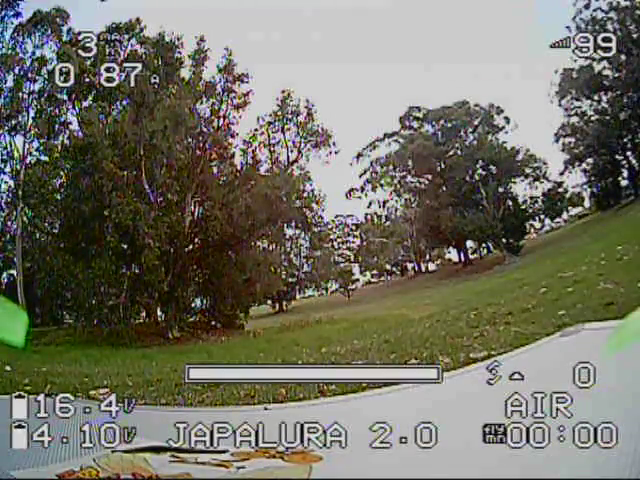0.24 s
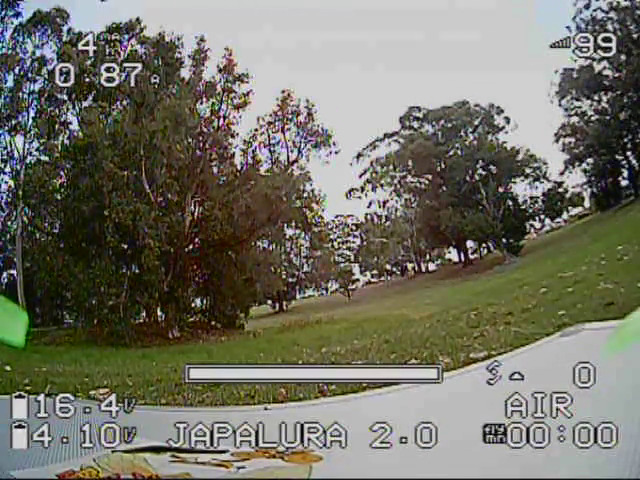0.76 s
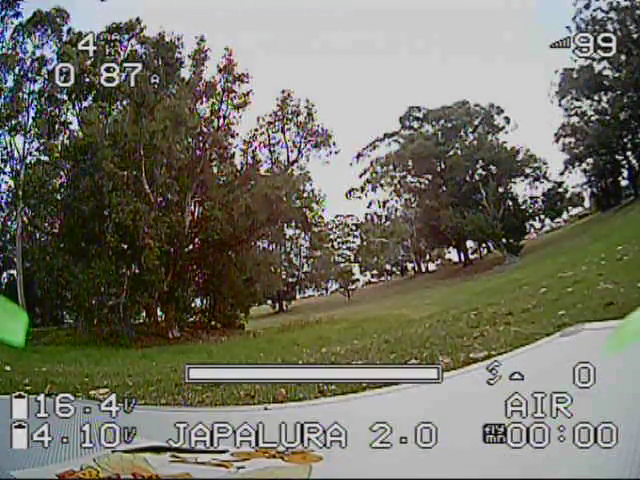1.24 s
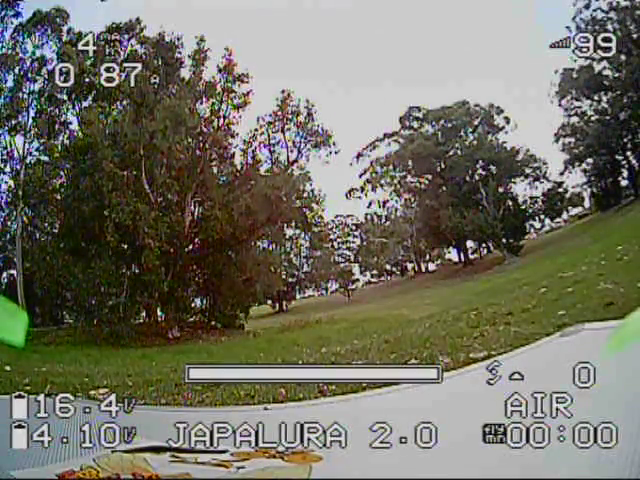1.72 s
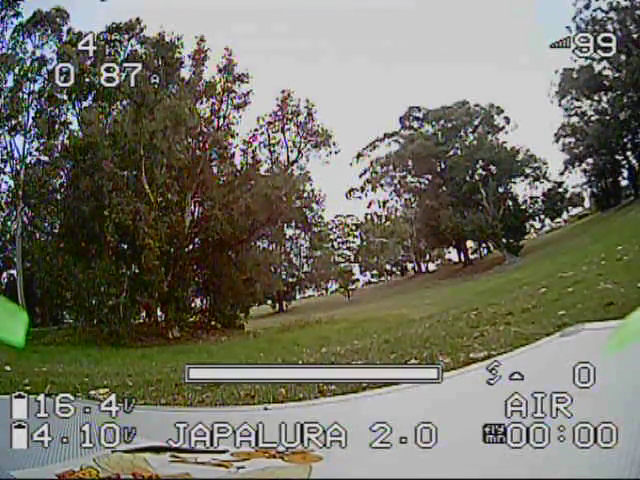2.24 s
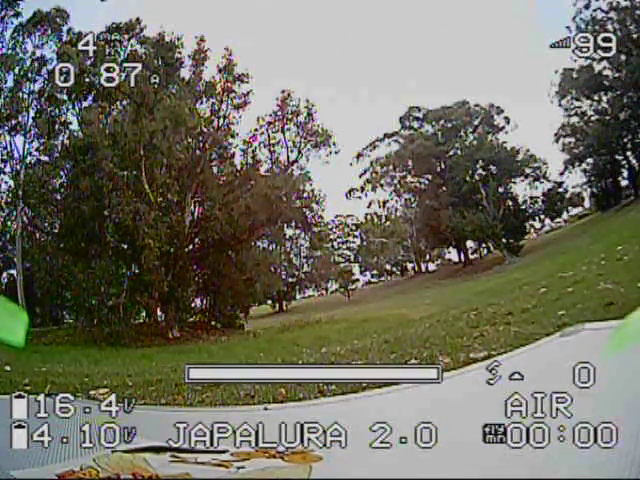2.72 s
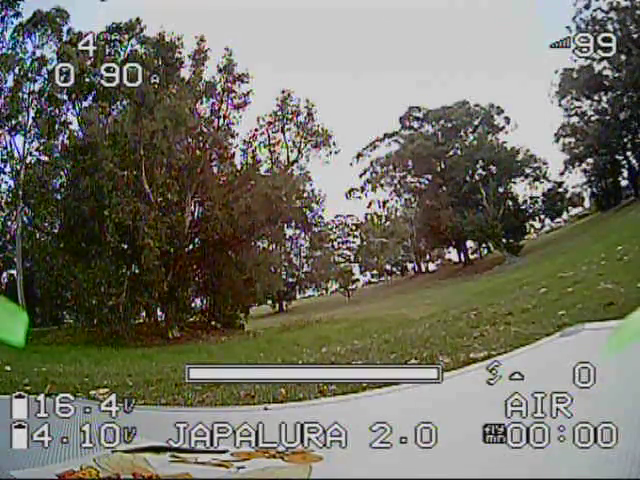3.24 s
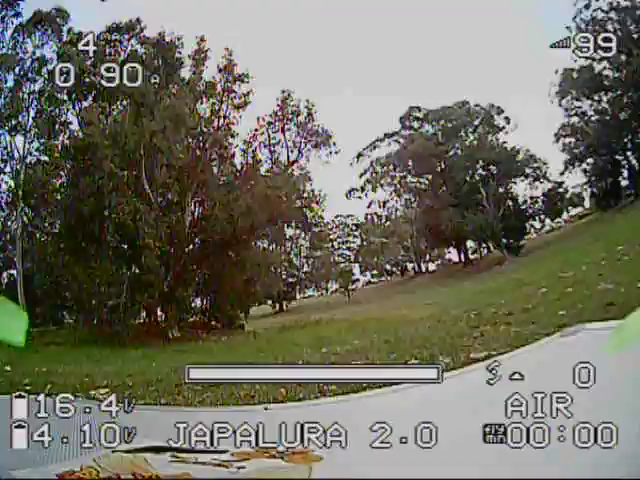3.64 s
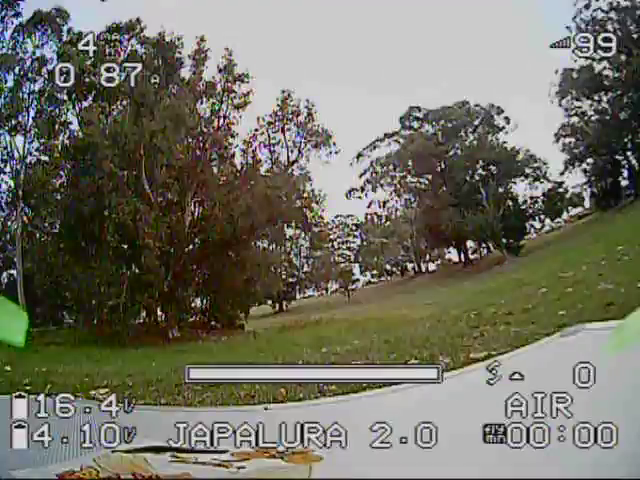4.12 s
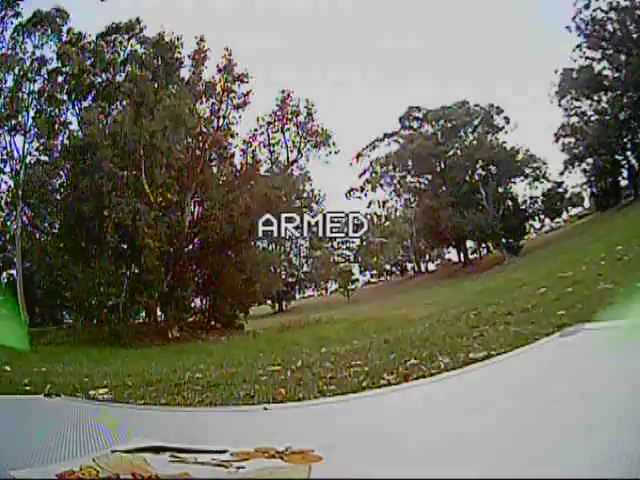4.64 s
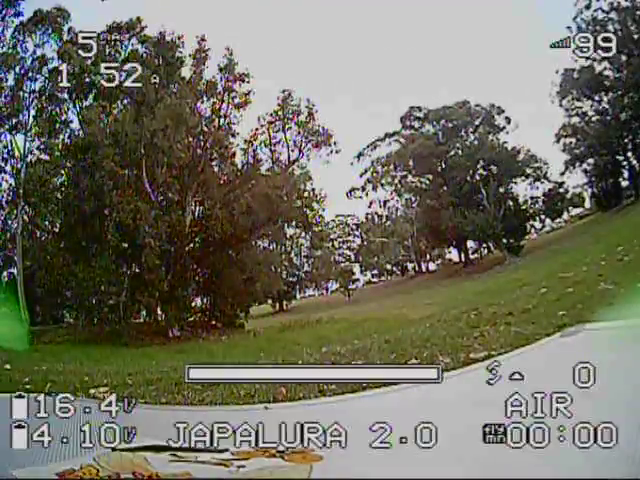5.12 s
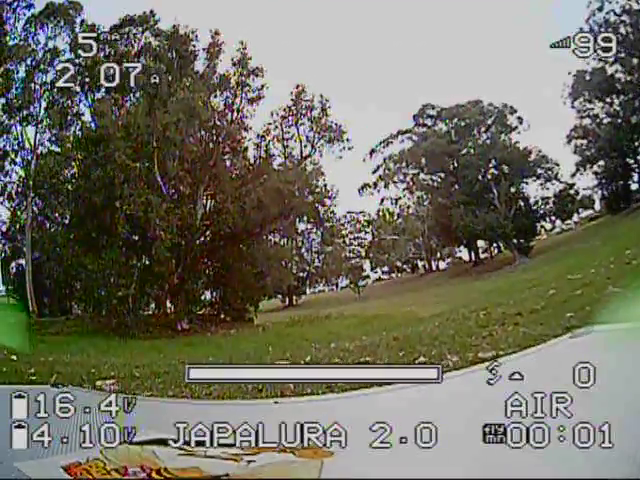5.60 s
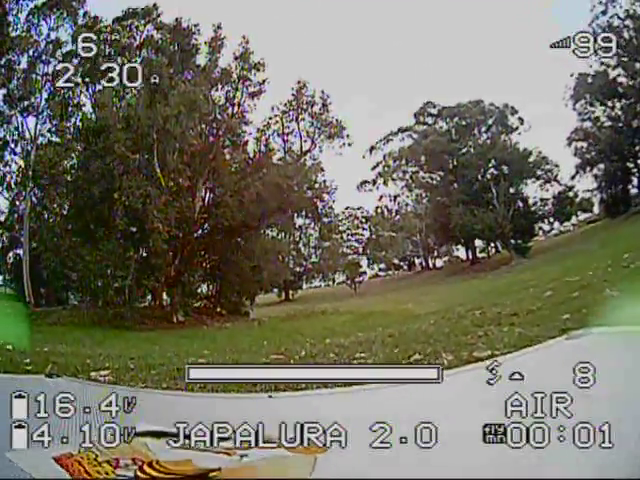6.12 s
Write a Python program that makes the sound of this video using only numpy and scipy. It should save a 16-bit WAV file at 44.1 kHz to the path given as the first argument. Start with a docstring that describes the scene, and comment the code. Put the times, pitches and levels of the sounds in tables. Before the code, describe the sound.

A small drone sits on pale ground in a grassy park, but only its video link is heard: a loud, unbroken electrical buzz at about 50 hertz, thick with fixed overtones and light hiss. The rasp fluctuates, surges into overload around two and three seconds, thins around four and a half to five, then returns. The sound is direct, dry and telephone-narrow, with no outdoor ambience or motor noise.

```python
"""The picture signal of a small drone's analog video link leaks into its sound channel: a loud, steady buzz.
Each field, 50 a second, sweeps the same hum, bright band and blanking gap; overlay text rows cut notches into it.
Busy zones of the field add puffs of noise over an even hiss. Three surges deepen the notches;
the main notch drops out while the overlay is cleared. The overdriven channel is telephone-narrow."""
import sys
import numpy as np
from scipy import signal
from scipy.fft import rfft, irfft
from scipy.io import wavfile

SR = 44100
rng = np.random.default_rng(int(sys.argv[2]) if len(sys.argv) > 2 else 0)


def wrap_up_sound(samples):
    """Save the sound to the file named by the first command line argument, as 16-bit audio."""
    columns = np.atleast_2d(samples).T
    # keep every value between -1 and 1, then stretch to whole-number steps
    tamed = np.clip(columns, -1, 1)
    steps = np.round(tamed * 32767).astype(np.int16)
    wavfile.write(sys.argv[1], SR, steps)


N = 280476

# Slow drift of the picture leak. Each row: time in seconds, leak (1 = main notch of depth 1).
LEAK_DRIFT = [(0.0, 0.34), (.28, 0.84), (.6, 0.28), (.95, .25), (1.22, 0.84), (1.62, 0.43), (1.86, .4),
              (2.1, 0.69), (2.22, 0.04), (2.7, 0.043), (2.86, 0.23), (3.06, 0), (3.2, 1.3), (3.38, 1.13),
              (3.66, 0.49), (4.57, 1.03), (5.65, 0.99), (6.36, 1.17)]
# Surges on top of the drift. Each row: start in seconds, rise in seconds, length in seconds, added leak.
LEAK_SURGES = [(1.655, 0.062, .195, 1.44), (1.867, 0.086, .31, 1.23), (3.075, .035, 0.18, 1.11)]
# Thin notches, always present. Each row: place in ms, half width in ms, mid depth, flicker in dB.
THIN_NOTCHES = [(7.4, .17, 0.21, 4), (13.35, 0.12, 0.091, 3), (16.85, 0.34, .16, 4.5),
                (17.9, 0.43, 0.065, 4)]
# Zones of fine, changing detail. Each row: place in ms, half width in ms, grain level in dB before overload.
GRAIN_ZONES = [(5.9, 0.59, -19), (7.3, 0.54, -15), (9.6, 0.87, -23.5), (11.9, 0.34, -18),
               (17.9, 0.85, -21.5)]
# Spectrum of the grain. Each row: frequency in Hz, relative density in dB per Hz.
GRAIN_SPECTRUM = [(60, -8.5), (250, 1), (600, 1.5), (950, -4), (1400, -1.2), (2100, -7.5), (3000, -10.5),
                  (4000, -10.5), (5000, -33.5)]
# Spectrum of the hiss. Each row: frequency in Hz, relative density in dB per Hz.
HISS_SPECTRUM = [(60, 2), (400, -3), (1000, -8), (2000, -7.5), (3800, -8.5), (5000, -31)]

FIELD_HZ, FIRST_FIELD_S = 49.9503, .012
FIELD_MS = 1000 / FIELD_HZ
T_S = np.arange(N) / SR
FIELDS = (T_S - FIRST_FIELD_S) * FIELD_HZ + 1  # running field count
SCAN_MS = FIELDS % 1 * FIELD_MS  # time since the top of the field

CHANNEL_RATE_HZ, EDGE_HZ = 8000, 16000
FULL_SCALE, OUTPUT_LIMIT = .71, .71
COUPLING_HZ = 19
BIAS = .03

SURGE_FALL_S = .09
OVERLOAD_LEAK = 1.2  # leak above this is overload
CLEAR_START_S, CLEAR_END_S = 4.58, 5.12  # main text row absent
CLEARED_LEAK, CLEARED_DELAY_MS = .42, .2  # the bright band starts later without text

# Second notch: depth and its growth; place with and without text.
SECOND_DEPTH, SECOND_PER_LEAK, SECOND_PER_OVERLOAD = .53, .18, .67
SECOND_MS, SECOND_CLEARED_MS = 10.3, 9.72
OVERSHOOT_PER_OVERLOAD = .28
# Near the end a third notch grows ever faster and the second fades.
LATE_START_S, LATE_GROWTH_PER_S2, LATE_FADE_PER_S = 5.23, .75, .42
# A notch at the bottom of the field shows only in overload.
BOTTOM_MS, BOTTOM_PER_OVERLOAD = 17.38, .3

# The mid-field rises with the leak and sags near the end.
SWING_REST, SWING_PER_LEAK, SWING_PER_OVERLOAD, SWING_SAG_PER_S = -.13, .15, .086, .15
# The bright band starts earlier as the leak falls, most of all near zero.
LEAD_PER_LEAK_MS, IDLE_LEAD_MS, IDLE_LEAK = -.12, .6, .17

HISS_DB, HISS_RISE_DB_PER_LEAK = -38, 2.8  # level at zero leak, and its rise
CRACKLE_DB_PER_OVERLOAD = 3


def gain_of(db):
    """Amplitude ratio of a level in dB."""
    return 10 ** (np.asarray(db) / 20)


def curve(rows):
    """Points joined by straight lines in time."""
    return np.interp(T_S, *np.transpose(rows))


def noise(spectrum):
    """Noise of rms 1 with the given spectrum, interpolated over log frequency."""
    hz, db = np.transpose(spectrum)
    bin_hz = np.fft.rfftfreq(N, 1 / SR)
    shape = gain_of(np.interp(np.log(bin_hz + 1), np.log(hz), db))
    shaped = irfft(rfft(rng.standard_normal(N)) * shape, N)
    return shaped / shaped.std()


def per_field():
    """One normal random value held through each field."""
    values = rng.standard_normal(int(FIELDS[-1]) + 1)
    return values[FIELDS.astype(int)]


def distance_ms(place_ms):
    """Signed scan time from a place in the field, the short way round."""
    return (SCAN_MS - place_ms + FIELD_MS / 2) % FIELD_MS - FIELD_MS / 2


def stripe(place_ms, width_ms):
    """A soft pulse each time the scan crosses a narrow zone."""
    return np.exp(-.5 * (distance_ms(place_ms) / width_ms) ** 2)


def band(start_ms, end_ms, rise_ms, fall_ms):
    """A flat pulse with soft edges each time the scan crosses a wide zone."""
    from_center_ms = distance_ms((start_ms + end_ms) / 2)
    half_ms = (end_ms - start_ms) / 2
    rise = .5 + .5 * np.tanh((half_ms + from_center_ms) / rise_ms)
    fall = .5 + .5 * np.tanh((half_ms - from_center_ms) / fall_ms)
    return rise * fall


def notch(place_ms, width_ms, flicker_db):
    """A steep-sided downward pulse at a thin row; place, width and depth flicker from field to field."""
    steepness, jitter_ms, width_flicker_db = 2.4, .035, 1.0
    place_ms = place_ms + jitter_ms * per_field()  # blurs the high harmonics
    width_ms = width_ms * gain_of(width_flicker_db * per_field())
    flicker = 1.5 * np.tanh(per_field() / 1.5)  # bounded
    pulse = np.exp(-.5 * abs(distance_ms(place_ms) / width_ms) ** steepness)
    return -gain_of(flicker_db * flicker) * pulse


def surges():
    """Added leak: each surge swells, holds and falls back."""
    total = 0
    for start_s, rise_s, length_s, size in LEAK_SURGES:
        rise = (T_S - start_s) / rise_s
        fall = (start_s + length_s - T_S) / SURGE_FALL_S
        total = total + size * np.clip(np.minimum(rise, fall), 0, 1)
    return total


def field_hum():
    """A cosine of one cycle per field."""
    return .61 * np.cos(2 * np.pi * distance_ms(11.207) / FIELD_MS)


def picture(swing, lead_ms):
    """Wide zones of the picture: a bright band with a jittering edge, the mid-field and the blanking gap."""
    bright = .52 * band(5.87 - lead_ms + .19 * per_field(), 11.1, rise_ms=.23, fall_ms=1.07)
    blanking = .36 * band(18.6 + .087 * per_field(), 22.15, rise_ms=.11, fall_ms=.75)
    middle = band(10.97, 15.74, rise_ms=.39, fall_ms=.96)
    middle -= 1.43 * band(6.0, 8.1, rise_ms=.33, fall_ms=.25)
    return bright - blanking + swing * middle


def notches(leak, overload, late_s, cleared):
    """Thin rows pull the signal down once a field: the rasp."""
    second_depth = SECOND_DEPTH + SECOND_PER_LEAK * leak + SECOND_PER_OVERLOAD * overload
    second_depth -= LATE_FADE_PER_S * late_s
    second_ms = np.where(cleared, SECOND_CLEARED_MS, SECOND_MS)
    total = ~cleared * leak * notch(11.9, width_ms=.28, flicker_db=1.52)
    total += second_depth * notch(second_ms, width_ms=.43, flicker_db=1.23)
    total *= 1 + OVERSHOOT_PER_OVERLOAD * overload  # main and second only
    total += LATE_GROWTH_PER_S2 * late_s ** 2 * notch(8.9, width_ms=.2, flicker_db=3.5)
    total += BOTTOM_PER_OVERLOAD * overload * notch(BOTTOM_MS, width_ms=.4, flicker_db=3.5)
    for place_ms, width_ms, depth, flicker_db in THIN_NOTCHES:
        total += depth * notch(place_ms, width_ms, flicker_db)
    return total


def grain(overload, lead_ms):
    """Fine detail gives a puff of noise in each busy zone, louder in overload."""
    zones = 0
    for index, (place_ms, width_ms, db) in enumerate(GRAIN_ZONES):
        shift_ms = lead_ms if index == 0 else 0  # the first zone rides on the bright band's edge
        flicker_db = 1.0 * per_field()
        zones = zones + gain_of(db + flicker_db) * stripe(place_ms - shift_ms, width_ms)
    return zones * gain_of(CRACKLE_DB_PER_OVERLOAD * overload) * noise(GRAIN_SPECTRUM)


def hiss(leak):
    """Even noise that grows with the leak."""
    return gain_of(HISS_DB + HISS_RISE_DB_PER_LEAK * leak) * noise(HISS_SPECTRUM)


def coupling(video):
    """A series capacitor blocks the mean brightness: first-order high-pass."""
    return signal.lfilter(*signal.butter(1, COUPLING_HZ, "high", fs=SR), video)


def scene():
    """Hum, picture, notches and grain locked to the field scan, plus hiss; one leak drives the changes."""
    cleared = (T_S > CLEAR_START_S) & (T_S < CLEAR_END_S)
    leak = np.where(cleared, CLEARED_LEAK, np.maximum(curve(LEAK_DRIFT) + surges(), 0))
    overload = np.maximum(leak - OVERLOAD_LEAK, 0)
    late_s = np.maximum(T_S - LATE_START_S, 0)
    swing = SWING_REST + SWING_PER_LEAK * leak + SWING_PER_OVERLOAD * overload
    swing -= SWING_SAG_PER_S * late_s
    lead_ms = LEAD_PER_LEAK_MS * leak + IDLE_LEAD_MS * np.exp(-leak / IDLE_LEAK)
    lead_ms -= CLEARED_DELAY_MS * cleared
    video = coupling(picture(swing, lead_ms) + notches(leak, overload, late_s, cleared))
    mix = field_hum() + BIAS + video + grain(overload, lead_ms) + hiss(leak)
    return mix[None]


def record(dry):
    """The narrow channel clips and rings at sharp corners; a last limit shaves the overshoots into faint ticks."""
    narrow = signal.resample_poly(dry[0], CHANNEL_RATE_HZ, SR)
    clipped = np.clip(narrow, -FULL_SCALE, FULL_SCALE)
    smooth = signal.resample_poly(clipped, SR, CHANNEL_RATE_HZ, window=("kaiser", 6))[:N]
    limited = np.clip(smooth, -OUTPUT_LIMIT, OUTPUT_LIMIT)
    low_pass = signal.firwin(255, EDGE_HZ, window=("kaiser", 7), fs=SR)
    return signal.oaconvolve(limited, low_pass, "same")[None]


dry = scene()
out = record(dry)
wrap_up_sound(out)
```